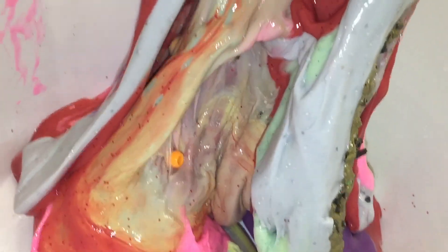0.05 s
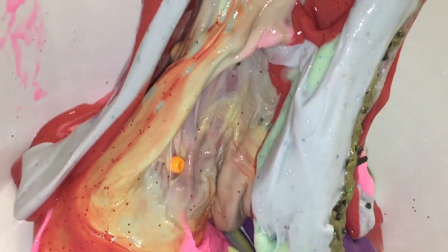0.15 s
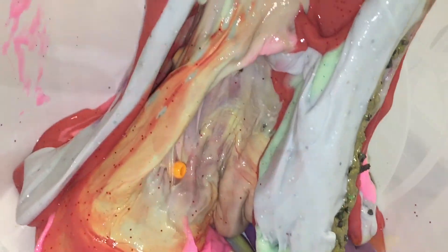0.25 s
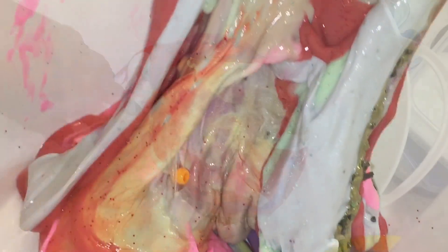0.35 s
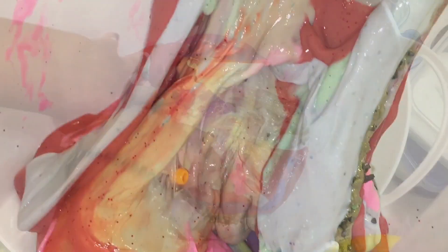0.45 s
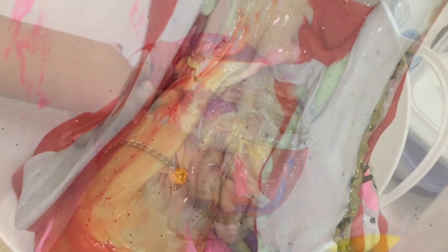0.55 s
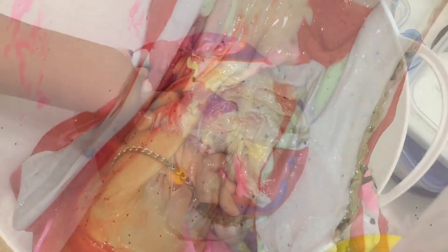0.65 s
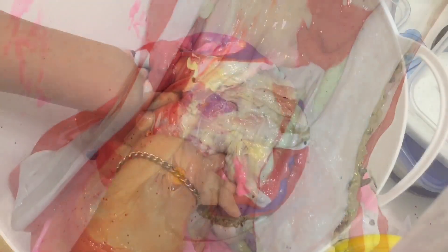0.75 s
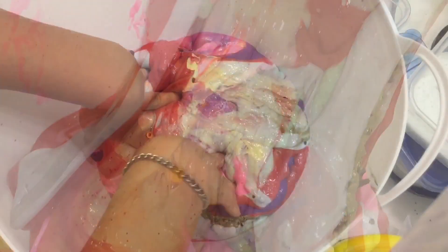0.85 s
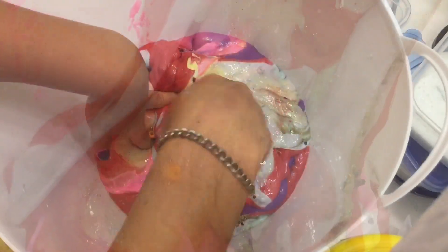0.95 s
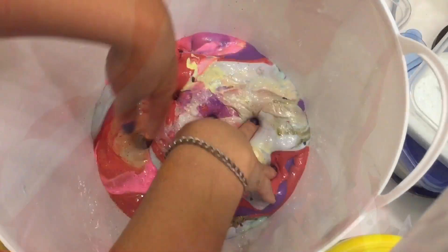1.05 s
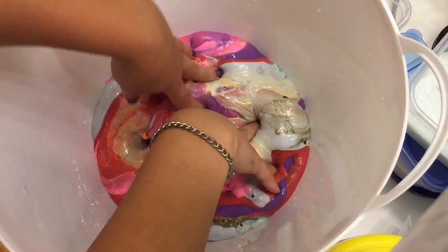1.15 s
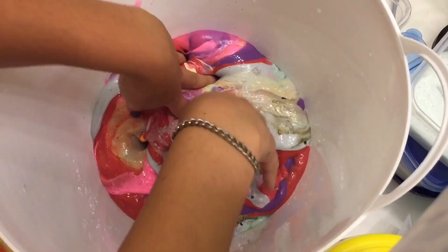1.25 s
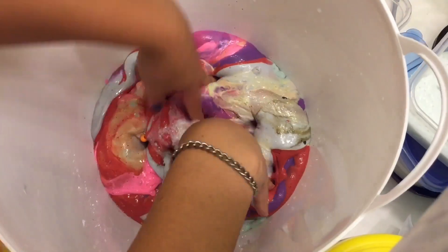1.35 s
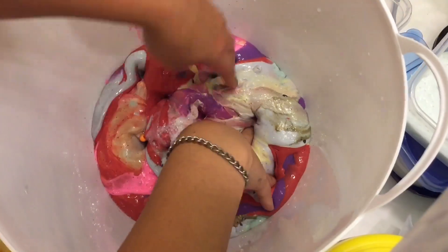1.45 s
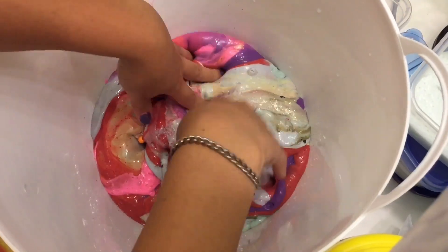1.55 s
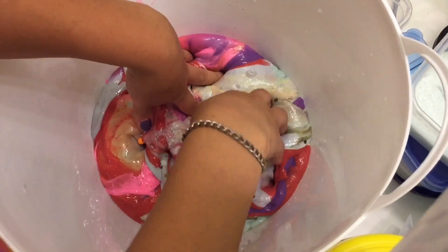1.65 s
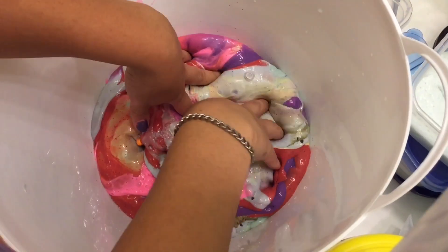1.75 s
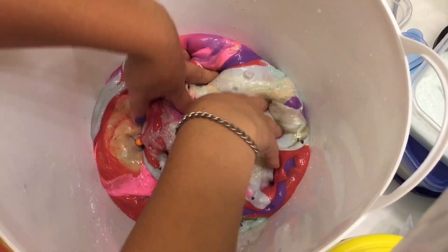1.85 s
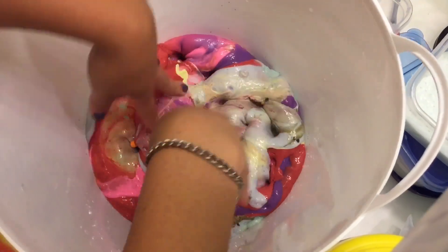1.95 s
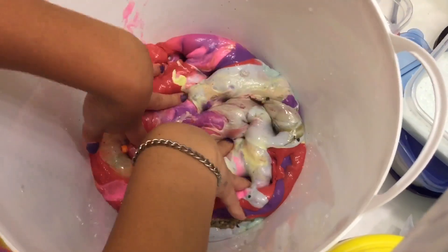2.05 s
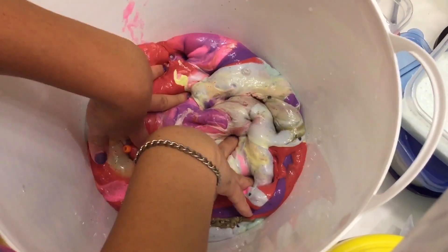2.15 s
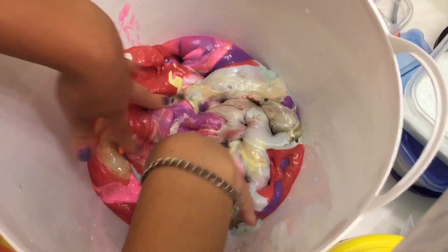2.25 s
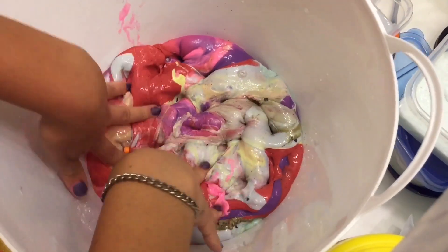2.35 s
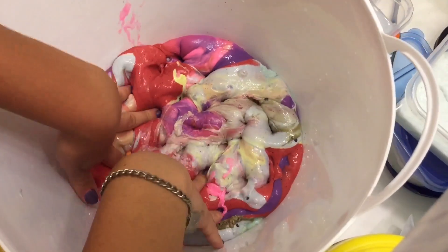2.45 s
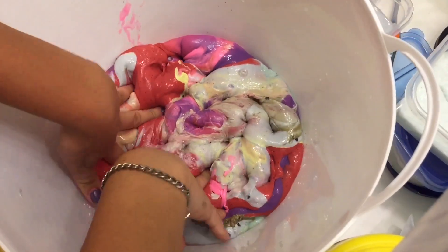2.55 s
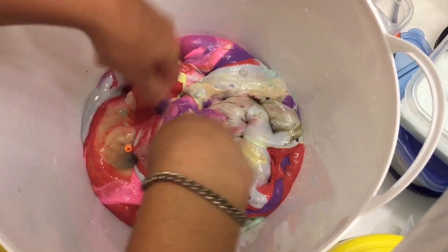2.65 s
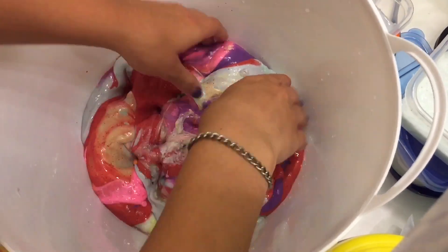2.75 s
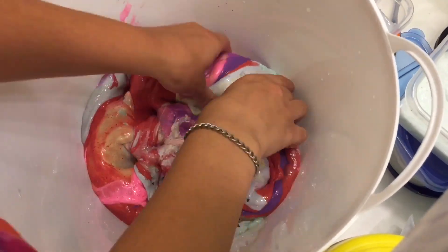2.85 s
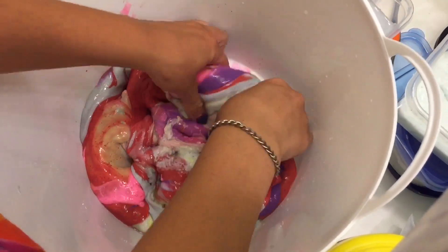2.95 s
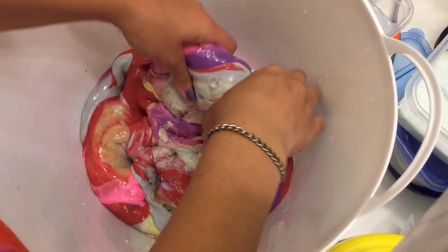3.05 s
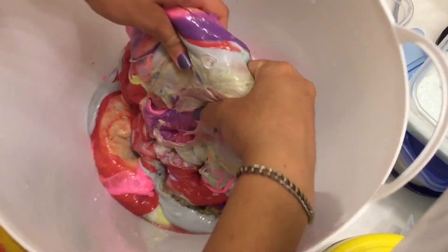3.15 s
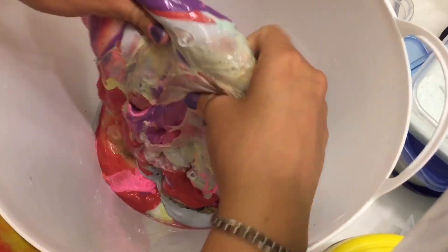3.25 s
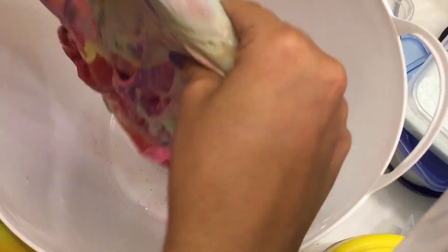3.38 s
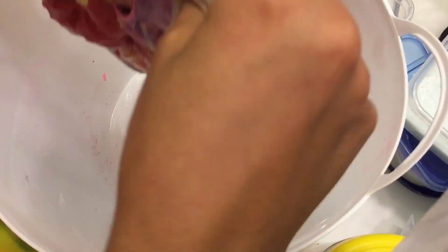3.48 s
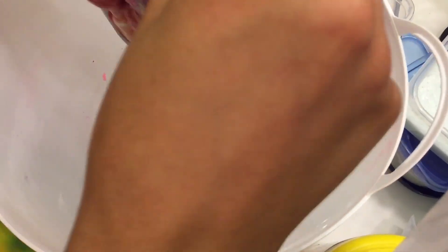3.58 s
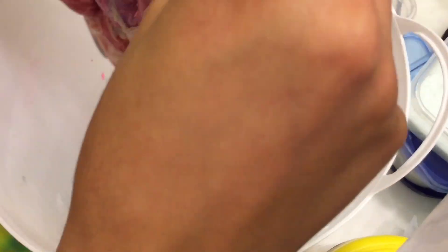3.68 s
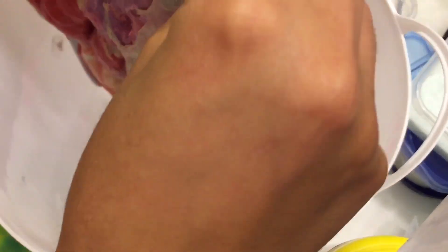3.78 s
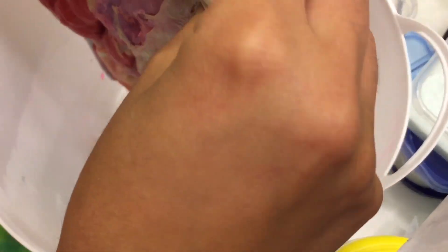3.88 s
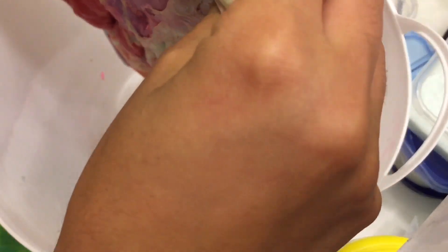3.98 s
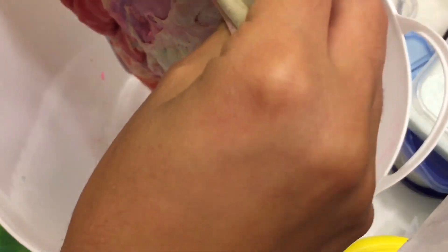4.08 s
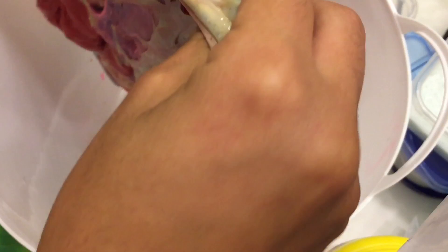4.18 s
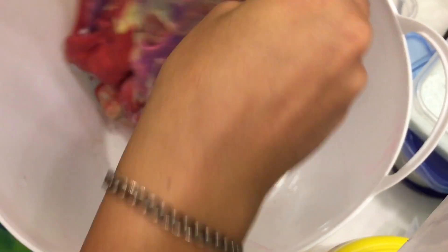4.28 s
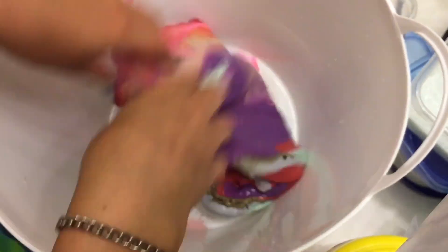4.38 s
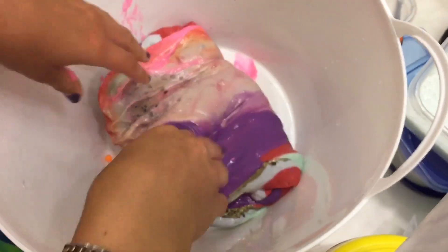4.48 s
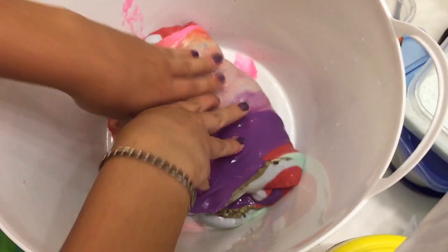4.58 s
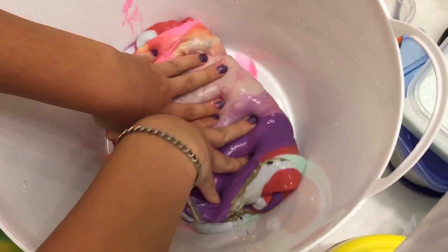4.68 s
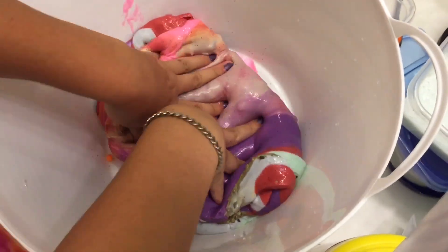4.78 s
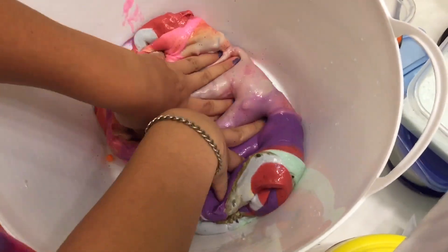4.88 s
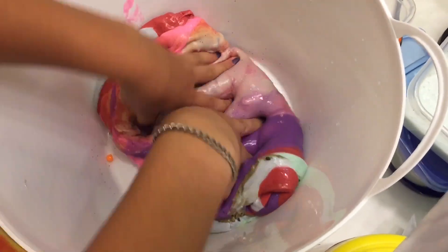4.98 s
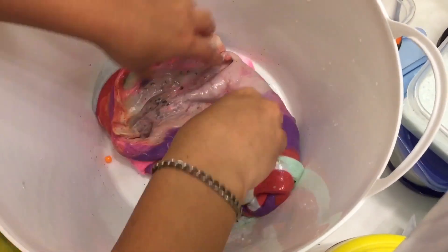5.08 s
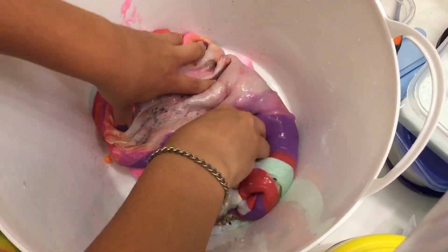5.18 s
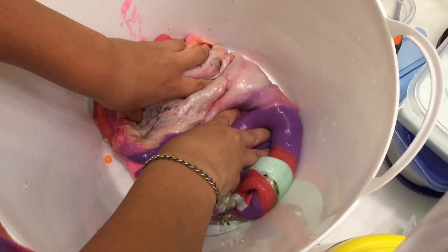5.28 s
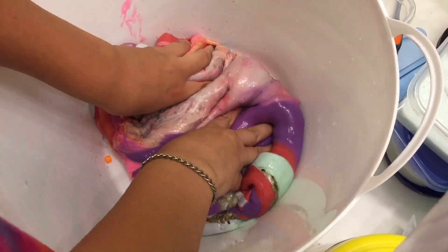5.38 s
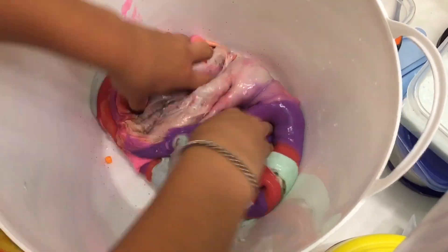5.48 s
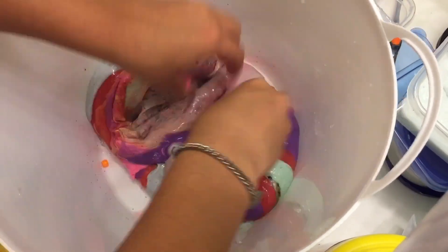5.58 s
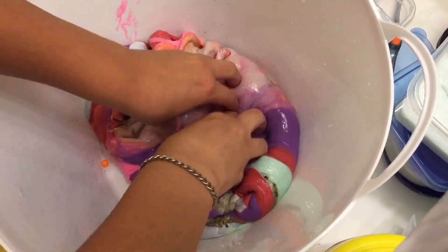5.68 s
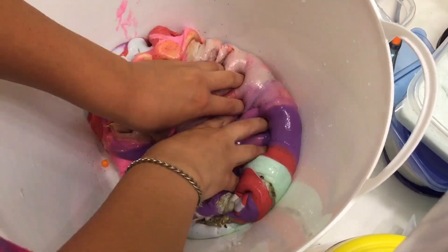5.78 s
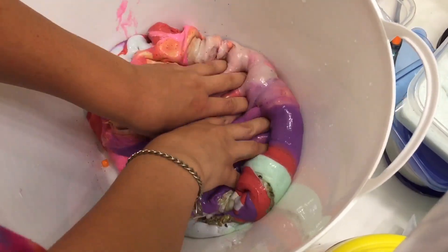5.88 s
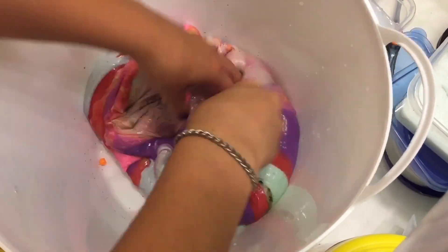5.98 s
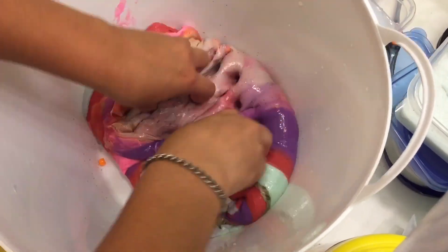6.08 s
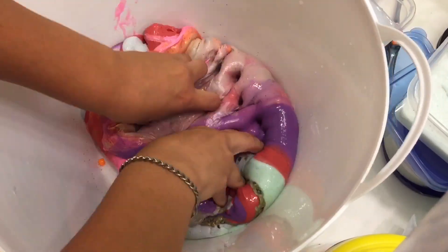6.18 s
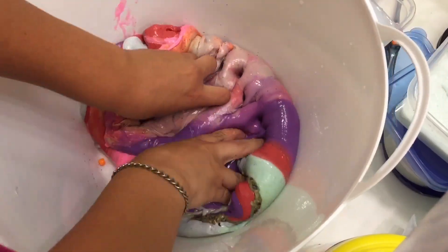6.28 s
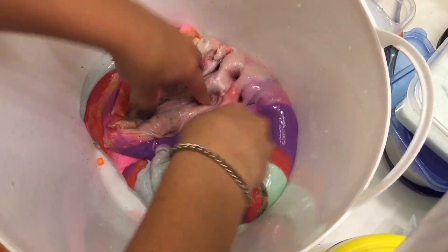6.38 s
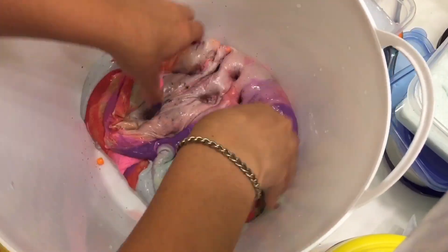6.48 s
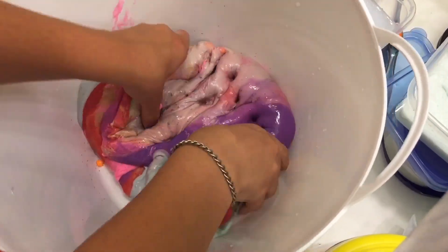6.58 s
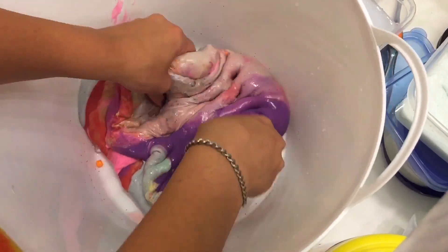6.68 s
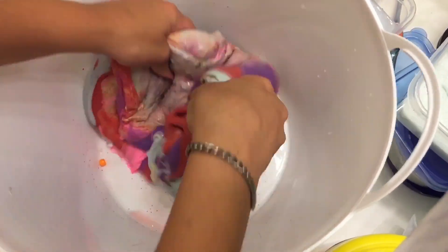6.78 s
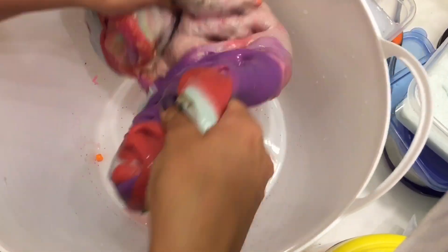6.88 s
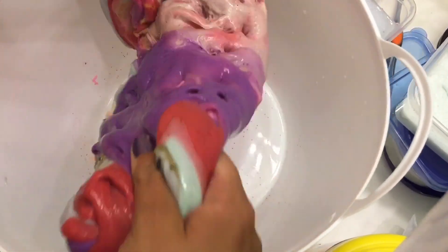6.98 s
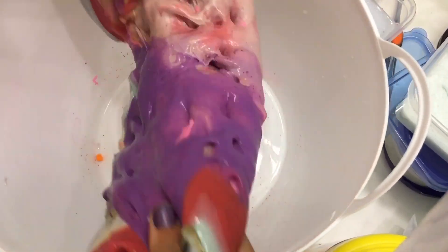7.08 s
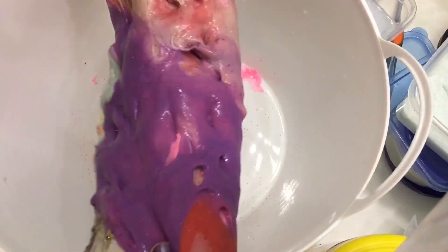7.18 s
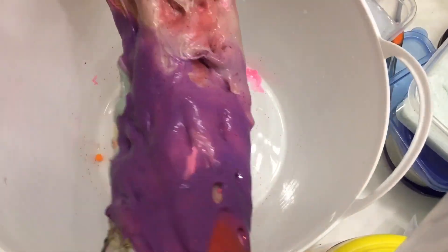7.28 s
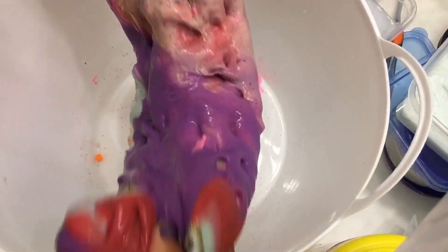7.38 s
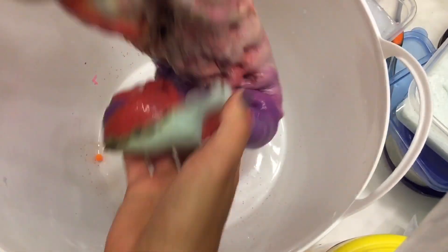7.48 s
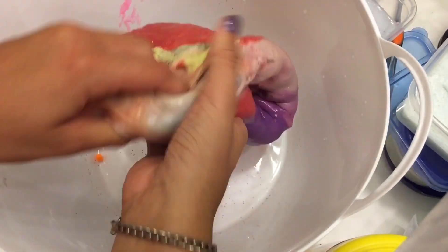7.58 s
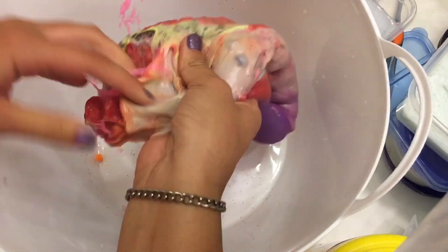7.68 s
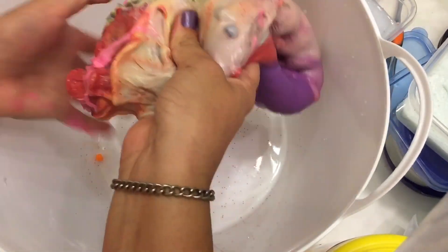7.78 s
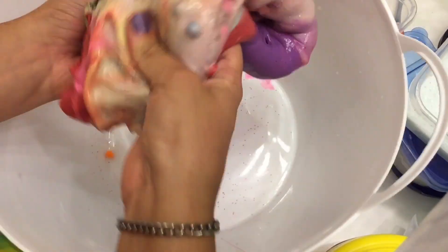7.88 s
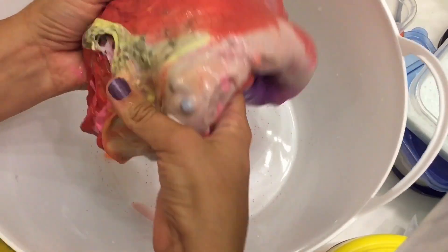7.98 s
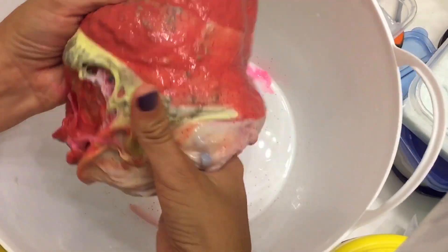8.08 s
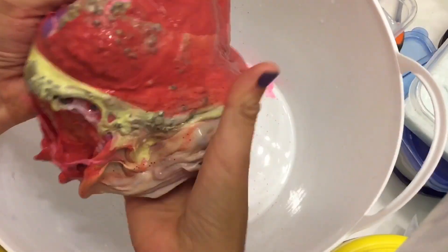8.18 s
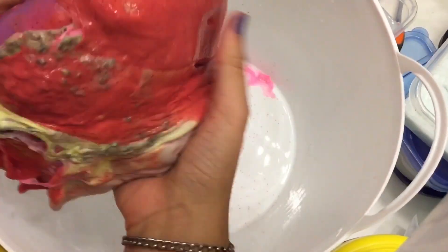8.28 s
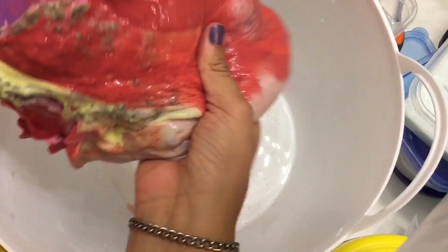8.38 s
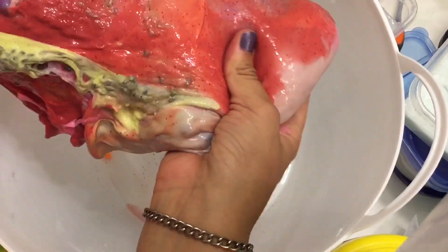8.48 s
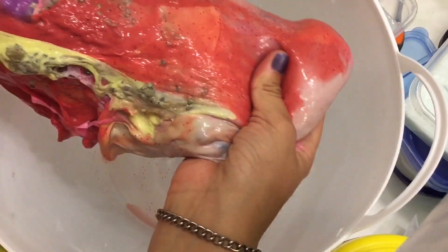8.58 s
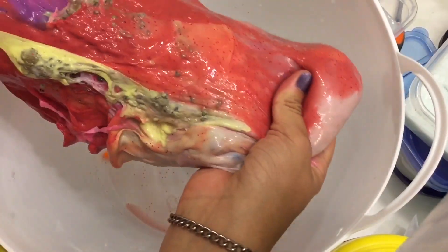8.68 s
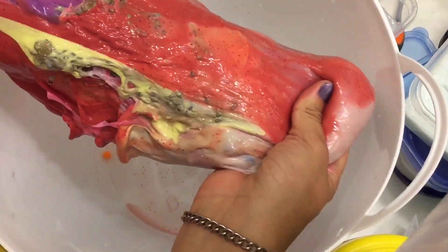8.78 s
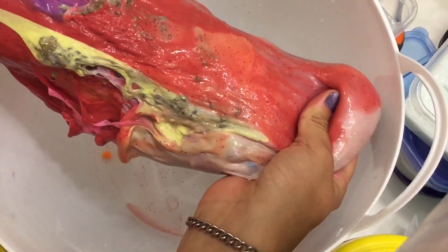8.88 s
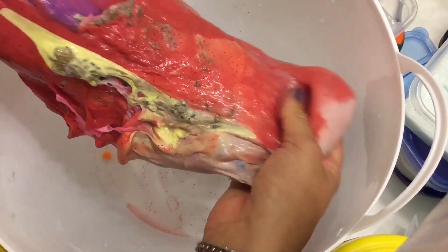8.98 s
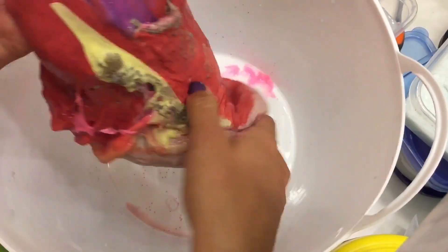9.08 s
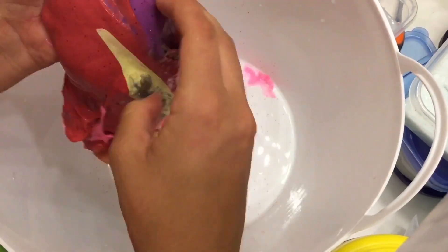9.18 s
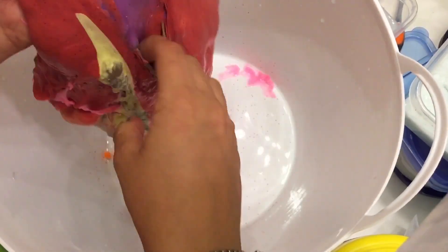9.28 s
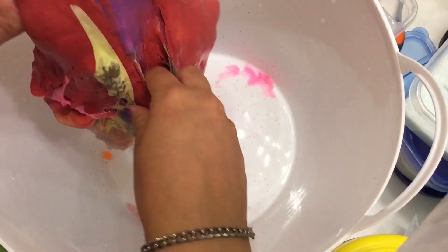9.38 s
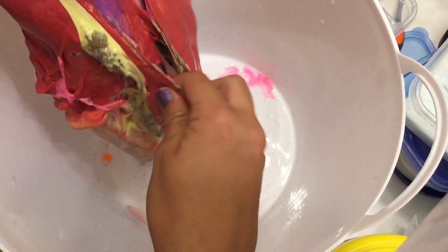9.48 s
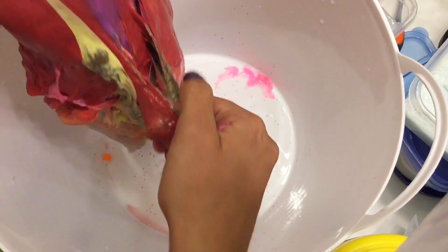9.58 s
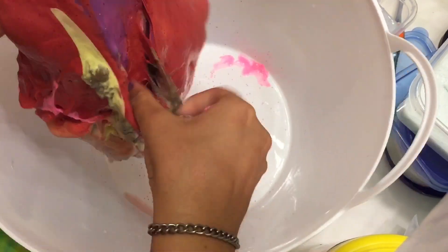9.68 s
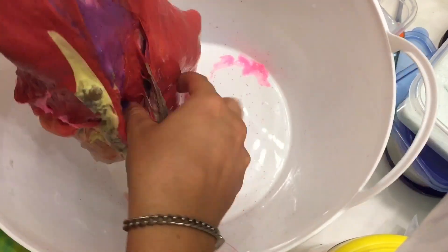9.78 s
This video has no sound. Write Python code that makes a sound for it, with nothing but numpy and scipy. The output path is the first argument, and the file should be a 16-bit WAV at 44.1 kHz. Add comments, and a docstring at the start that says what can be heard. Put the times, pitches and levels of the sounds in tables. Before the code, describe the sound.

Hands squish a large mass of slime, bursting air pockets in sticky snaps, crackles and small hollow thumps.

```python
"""Slime kneaded by hand in a plastic tub, close to one microphone in a small room.
Trapped air pockets burst: a film snaps, a small pocket rings, a large cavity thumps. Air hisses out of
squeezed folds and wet slime fizzes as it peels off skin; the tub and the room ring on after the bursts.
Low room hum and microphone hiss lie underneath; a deeper rumble fades out after the first second."""
import sys
import numpy as np
from scipy import signal
from scipy.fft import rfft, irfft, next_fast_len
from scipy.io import wavfile
from scipy.ndimage import uniform_filter1d, map_coordinates

SR = 44100
rng = np.random.default_rng(int(sys.argv[2]) if len(sys.argv) > 2 else 0)


def digitize_waveform(pressure):
    """Quantize a signal to 16-bit integers and store it at the path in sys.argv[1].

    Rows of a 2-D input are taken as channels; values are limited to [-1, 1].
    """
    field = np.atleast_2d(pressure).T
    bounded = np.clip(field, -1, 1)
    quanta = np.round(bounded * 32767).astype(np.int16)
    wavfile.write(sys.argv[1], SR, quanta)


N = 433944
BURST_T = np.arange(SR // 25) / SR  # time axis of one burst, s

# Tub resonances, plus a dip near 4.4 kHz and a broad treble lift: f/Hz, width/Hz, level/dB
TUB_COLOUR = [(232.8, 3.1, 3.5), (332, 34, 2), (415.8, 9.6, 5.5), (700.4, 69, 7.5), (897, 10, 0),
              (1607, 24, 2.5), (2210, 28, -4.5), (2480, 45, -3), (3490, 100, -1), (4360, 170, -12.5),
              (5260, 3000, -12.5)]
# Course of the room tone: t/s, hum level/dB, rumble level/dB
ROOM_LEVELS = [(0, -55, -48), (.3, -60, -50.5), (.6, -56.5, -55), (.95, -59, -57), (1.05, -53, -103),
               (9.84, -54, -95.5)]


def amp(db):
    """dB to gain."""
    return 10 ** (np.asarray(db) / 20)


def unit(x):
    """Scaled to rms 1."""
    return x / np.sqrt(np.mean(x ** 2) + 1e-20)


def along(points, hz):
    """Interpolate (f/Hz, value) points on a log frequency axis."""
    freqs, values = np.transpose(points)
    return np.interp(np.log(hz + 1), np.log(freqs + 1), values)


def curves(rows):
    """One value per sample for each column after the time."""
    times, *columns = np.transpose(rows)
    return [np.interp(np.arange(N) / SR, times, column) for column in columns]


def filtered(x, response):
    """x through a complex response of frequency."""
    size = next_fast_len(N + SR // 2)
    return irfft(rfft(x, size) * response(np.fft.rfftfreq(size, 1 / SR)), size)[..., :N]


def coloured(x, spectrum):
    """x shaped by a spectrum that is silent outside its points, rms 1."""
    inside = lambda hz: (hz >= spectrum[0][0]) & (hz <= spectrum[-1][0])
    return unit(filtered(x, lambda hz: amp(along(spectrum, hz)) * inside(hz)))


def wobble(per_s):
    """A smooth random curve with per_s knots a second."""
    knots = rng.standard_normal(int(N * per_s / SR) + 4)
    return map_coordinates(knots, [np.arange(N) * per_s / SR])


def modes(table):
    """The response of resonances (f/Hz, width/Hz, level/dB), summed with alternating signs."""
    return lambda hz: sum((-1) ** k * amp(db) * 1j * hz * width / (f * f - hz * hz + 1j * hz * width)
                          for k, (f, width, db) in enumerate(table))


def room_hum():
    """Low room hum with microphone hiss; three faint tones swell in over the first 1.33 s."""
    # Hum and hiss: f/Hz, relative density/dB
    hum_spectrum = [(20, -58), (40, -38.5), (52, -21.5), (64, -9.5), (100, -2), (190, -3.5), (300, -5.5),
                    (430, -11.5), (510, -27), (730, -21.5), (1360, -32), (2400, -31), (4500, -38),
                    (7000, -41), (11000, -40.5), (15300, -44), (16500, -40.5)]
    # Tones in the hum: f/Hz, width/Hz, level/dB
    hum_tones = [(239.2, 1.7, -57), (437.2, 11, -70.5), (128.1, 53, -69.5)]
    hum = amp(curves(ROOM_LEVELS)[0]) * coloured(rng.standard_normal(N), hum_spectrum)
    tones = sum(amp(db) * unit(filtered(rng.standard_normal(N), modes([(hz, width, 0)])))
                for hz, width, db in hum_tones)
    return hum + np.clip(np.arange(N) / SR / 1.33, 0, 1) * tones


def rumble():
    """A deep, wavering noise that drops away after the first second."""
    # Rumble: f/Hz, relative density/dB
    rumble_spectrum = [(12, -26), (22, -10.5), (50, -13), (130, -1.5), (200, -24), (300, -41.5)]
    noise = coloured(rng.standard_normal(N), rumble_spectrum)
    return noise * amp(curves(ROOM_LEVELS)[1] + 1.2 * wobble(per_s=3.7))


def crackle(per_s, spread_db, share):
    """Tiny film ruptures of very uneven size over a bed of noise."""
    ticks = (rng.random(N) < per_s / SR) * amp(spread_db * rng.standard_normal(N))
    decay = np.exp(-np.arange(400) / SR / .0015)
    envelope = unit(signal.fftconvolve(ticks, decay)[:N])
    return (share * envelope + 1 - share) * rng.standard_normal(N)


def peel():
    """Slime tearing off skin fizzes in the treble, in clumps."""
    # Course of the peeling: t/s, level/dB
    peel_levels = [(0.0, -74), (1.01, -86), (2.8, -71.5), (3.01, -52), (3.51, -79.5), (3.94, -102),
                   (4.11, -48.5), (4.25, -70.5), (4.88, -64), (5.34, -77), (6.38, -72), (6.63, -56),
                   (6.85, -61), (7.01, -75.5), (7.95, -72.5), (8.11, -56), (8.25, -71.5), (9.0, -78),
                   (9.4, -66.5), (9.84, -78)]
    # Fizz: f/Hz, relative density/dB
    fizz_spectrum = [(3000, -24), (4500, 6), (6000, 2.5), (9000, -14), (13000, 0), (16000, -6)]
    fizz = coloured(crackle(per_s=150, spread_db=5, share=.6), fizz_spectrum)
    return fizz * amp(curves(peel_levels)[0] + 5.5 * wobble(per_s=11))


def bubble(hz, cycles, rise):
    """A damped air spring; rise lifts its pitch as its mouth opens."""
    turns = hz * BURST_T
    return np.sin(2 * np.pi * turns * (1 + rise * np.minimum(turns, 8))) * np.exp(-turns / cycles)


def room_tail():
    """A fresh echo off the nearby walls, energy 1; each frequency dies at its own speed."""
    # Reverberation of the small room: f/Hz, t60/s
    decay_times = [(200, 0.21), (450, 0.11), (700, 0.17), (1100, 0.098), (2800, 0.18), (7300, 0.089),
                   (15000, 0.11)]
    hz, t, noise = signal.stft(rng.standard_normal(SR // 5), SR, nperseg=128)
    decay = amp(-60 * t / along(decay_times, hz)[:, None])
    tail = signal.istft(noise * decay, SR, nperseg=128)[1]
    tail *= 1 - np.exp(-np.arange(len(tail)) / SR / 0.00022)  # echoes build up after the direct sound
    return tail / np.linalg.norm(tail)


def add_burst(track, start, direct, scattered):
    """One part reaches the microphone directly, the other by way of the walls."""
    for sound in (direct, signal.fftconvolve(scattered, room_tail())):
        span = track[round(start * SR):][:len(sound)]
        span += sound[:len(span)]


def snaps():
    """A surface film snaps and the pocket under it rings; a short, noisy echo follows each pop."""
    # Surface bursts: t/s, snap level/dB, snap f/Hz, pocket f/Hz, pocket level/dB, echo level/dB
    # (all levels relative)
    bursts = [(0.4517, -36, 5620, 3280, -66, -12), (0.6325, -39.5, 4500, 3920, -48.5, 3),
              (0.6841, -47, 10360, 2720, -64, -14), (0.699, -47, 10400, 2540, -50.5, 0.5),
              (0.9738, -40, 5160, 2340, -51, -6), (0.982, -40, 13260, 3920, -49, -6),
              (0.9911, -26, 12900, 2160, -41, -3.5), (1.1057, -36, 5260, 1240, -57, 0),
              (1.113, -33.5, 8370, 2010, -55, -7), (1.1875, -46, 11360, 3130, -55, -12),
              (1.257, -44.5, 12900, 2230, -65, -2), (1.3253, -40.5, 7570, 1440, -61, 7.5),
              (1.3417, -18.5, 12400, 1730, -30.5, -3), (1.3556, -22, 5800, 1850, -29, -10),
              (1.4485, -44, 5900, 2070, -65, 7), (1.473, -43, 6040, 3250, -53.5, 2.5),
              (1.4802, -35.5, 10430, 3200, -51, -2), (1.6135, -33, 7630, 3680, -38.5, -9.5),
              (1.6311, -16, 12200, 3200, -40, -9), (1.6443, -11.5, 11200, 2800, -31, -7.5),
              (1.6869, -35, 12120, 2840, -63, -11), (1.9678, -33, 13300, 2900, -44, 3),
              (1.9811, -25, 14600, 1580, -43, 5.5), (2.0872, -41, 9250, 1860, -55, -4),
              (2.1303, -39, 8060, 2280, -59, -1), (2.217, -39, 13730, 1490, -73, -12),
              (2.3124, -39, 13570, 1520, -57, -2), (2.3233, -45, 11970, 1310, -47.5, -2.5),
              (2.3295, -30, 13700, 1510, -51, 6), (2.3443, -30.5, 5230, 1310, -45, 0.5),
              (2.639, -64, 4780, 3440, -58, 3), (2.684, -28, 12000, 1580, -48.5, 4.5),
              (2.7019, -24.5, 11600, 2420, -42, -7), (2.7983, -36, 4920, 2860, -37.5, 4),
              (2.8088, -32, 6030, 3200, -45, -6), (2.8278, -36, 5300, 2800, -34.5, 1.5),
              (2.8438, -33, 4500, 4300, -34.5, 1), (2.872, -33, 5860, 3000, -42, -2),
              (2.9039, -36, 5920, 3760, -38, -6), (2.919, -27, 5800, 3150, -40, -5.5),
              (2.982, -36.5, 11340, 1450, -48, 0), (3.015, -23.5, 11800, 2400, -29.5, -10),
              (3.0248, -22, 6000, 2230, -37, -14), (3.0805, -23.5, 5760, 2900, -38, -1),
              (3.141, -35, 6340, 2970, -47, 3.5), (3.156, -37, 10360, 3170, -57, -3),
              (3.1758, -30, 4690, 2850, -38.5, -0.5), (3.265, -22.5, 4870, 1940, -38.5, -2),
              (3.284, -53, 5700, 1990, -45, -10), (3.3155, -41, 5810, 1870, -54, -6),
              (3.4254, -50, 6410, 2490, -53.5, 4.5), (3.4571, -28.5, 4830, 2440, -27.5, -7),
              (3.9233, -8, 5270, 3740, -16.5, -3.5), (3.9445, 9.5, 5080, 2460, -12.5, -11),
              (4.0024, -7.5, 5460, 2300, -21, -8.5), (4.098, -45, 5470, 2360, -37, -5.5),
              (4.118, -47, 4800, 2250, -41, -9), (4.1498, -24, 5200, 2420, -34, -9),
              (4.1805, -36, 5910, 2580, -42.5, -2.5), (4.2132, -20, 4700, 2880, -33.5, -7),
              (4.226, -20, 5140, 2290, -40.5, -14), (4.2454, -21, 5930, 2420, -35.5, -11.5),
              (4.4581, -6.5, 5500, 2420, -17, -9), (4.4748, -7, 6300, 2140, -16.5, -4),
              (4.4776, -16, 11400, 1700, -31.5, -1), (4.4934, -21, 4800, 1750, -16.5, -4),
              (4.503, -21, 5600, 4700, -15.5, -6), (4.539, -40, 5030, 2900, -31, -4.5),
              (4.566, -29, 4650, 2190, -29.5, 1), (4.5992, -30, 4810, 2290, -29, 1),
              (4.6499, -54, 5230, 2620, -27, -5.5), (4.674, -47, 4800, 3170, -34.5, -9),
              (4.7286, -33, 5670, 1910, -40, -6), (4.7641, -33.5, 8010, 1830, -59, -6),
              (4.8186, -33, 5850, 3480, -53, -9), (4.8365, -41, 5640, 3500, -59, -8),
              (4.8569, -36, 7730, 2380, -50.5, -0.5), (4.8922, -34, 5050, 2260, -43, -8.5),
              (4.9241, -37, 6140, 2380, -64, -12), (5.05, -43, 11480, 1260, -65, 9),
              (5.0794, -35, 10300, 2540, -50, 0), (5.1005, -15.5, 7960, 1780, -31, -9.5),
              (5.2555, -57.5, 4580, 1300, -41, -6), (5.2798, -47.5, 9600, 1300, -52, -6),
              (5.2957, -42, 5280, 1980, -37, -10), (5.315, -40, 5260, 3000, -44, -12),
              (5.344, -46, 13000, 4400, -52, -5), (5.4004, -45, 13710, 2020, -39, -7.5),
              (5.4114, -31.5, 11900, 2550, -54, -6), (5.4678, -38, 5700, 2840, -49, -7),
              (5.485, -44, 5400, 2500, -55, -16), (5.5044, -34, 12800, 3900, -44, -9),
              (5.5671, -17, 8700, 1620, -28, -7.5), (5.5865, -17, 13420, 1300, -42, -3),
              (5.5924, -21, 5000, 1890, -28.5, -3.5), (5.6168, -20.5, 5100, 2730, -38, -3.5),
              (5.737, -48, 4500, 1290, -34.5, -2.5), (5.7568, -34, 6580, 2430, -37, -8),
              (5.7688, -39.5, 8700, 1700, -54, -2), (5.8413, -39, 9220, 1570, -70, -18),
              (5.8592, -44, 14900, 2260, -69, -4), (5.8936, -44, 13880, 3100, -63, -9),
              (5.9818, -45, 13200, 2940, -52, -7.5), (6.0274, -39.5, 11920, 2980, -54, -1),
              (6.047, -20, 13100, 2700, -29, -4), (6.0593, -20, 9100, 2930, -31, -8),
              (6.0787, -21, 14650, 2660, -42, -1), (6.1013, -38, 12100, 2520, -49, -11),
              (6.2156, -29, 6600, 2670, -35.5, -6), (6.2804, -40.5, 5200, 1820, -50, -3),
              (6.3234, -47, 10200, 2870, -68, -3), (6.3397, -31, 4840, 1920, -39.5, -3),
              (6.4378, -34, 4670, 4490, -46, -2), (6.446, -24, 12420, 2870, -46, -2),
              (6.471, -26, 9800, 3240, -49, 8), (6.478, -17.5, 11440, 2830, -25.5, -5.5),
              (6.4854, -17, 5630, 2850, -26.5, -8), (6.5418, -25, 5220, 2990, -33.5, -3.5),
              (6.5636, -22, 5930, 2930, -28.5, -3.5), (6.5847, -22, 5800, 3250, -47, -2),
              (6.6043, -28.5, 5730, 3240, -40, 2), (6.6518, -34, 5320, 1940, -39.5, -6),
              (6.678, -46, 9500, 3000, -64, -10), (6.7661, -40.5, 6090, 1820, -47.5, 2),
              (6.7963, -44, 5450, 2050, -40.5, -5.5), (6.815, -37, 5700, 3900, -51, -9),
              (6.8276, -48, 9100, 1770, -60.5, 12), (6.9433, -19, 4910, 2560, -20, -4),
              (6.9528, -17, 4670, 2070, -20.5, -3.5), (7.002, -26.5, 5550, 2335, -29.5, -3.5),
              (7.0237, -47.5, 8700, 1690, -39.5, -3), (7.2291, 3.5, 4800, 2370, -13.5, -7.5),
              (7.2536, -9, 5120, 2010, -31.5, -11), (7.3428, -41, 9450, 2200, -34.5, -13),
              (7.4477, -39.5, 13600, 3750, -73, -14), (7.5997, -37, 5080, 4420, -59, -4),
              (7.6148, -27.5, 4750, 4490, -35.5, -16), (7.6645, -41, 4750, 3480, -52, -12),
              (7.689, -35, 7500, 3780, -68, -6), (7.7623, -41, 5190, 3240, -52.5, -1),
              (7.793, -49.5, 8400, 3100, -64.5, -5), (7.8776, -37, 5230, 4610, -38, -6),
              (7.9301, -35, 4970, 2460, -30.5, -4.5), (7.9399, -32, 4910, 2250, -29.5, -3),
              (7.9563, -32, 13310, 1440, -46, -7), (7.9816, -43, 5320, 2060, -34.5, -8),
              (8.0529, -24.5, 8400, 3360, -29.5, -3.5), (8.0888, -42, 7950, 1680, -43, -5.5),
              (8.116, -40, 5860, 2420, -39.5, 2.5), (8.1278, -20, 4500, 2420, -22.5, -7.5),
              (8.1506, -0.5, 5000, 2570, -10.5, -10.5), (8.1705, -11, 5000, 2220, -27, -11.5),
              (8.184, -20, 5000, 2260, -37.5, -9), (8.1922, -16.5, 4900, 3430, -36, -7),
              (8.2082, -23, 6040, 2260, -35, -4), (8.2212, -27, 13600, 2800, -43, -3),
              (8.229, -34, 7900, 2900, -49, -1), (8.2507, -26, 4950, 2690, -30, -4),
              (8.299, -47.5, 9100, 1240, -48.5, -2), (8.4617, -39, 8630, 1310, -77.5, -1),
              (8.534, -46, 12200, 2410, -70, -4), (8.6755, -47.5, 5450, 2340, -55, -10),
              (8.7362, -47, 9330, 1796, -76, -16), (9.1356, -35.5, 5030, 3200, -43, 1),
              (9.1494, -40, 5160, 3020, -36.5, -2), (9.2227, -40.5, 10200, 3820, -56, -18),
              (9.3003, -40, 6070, 2740, -36, -7), (9.3565, -49, 8400, 1230, -58, 2),
              (9.4401, -37, 4970, 3180, -66, -4), (9.4491, -31, 4950, 3830, -58, -6),
              (9.4679, -35, 12750, 4000, -52, -6), (9.507, -48, 12600, 3800, -68, -12),
              (9.5473, -41, 11220, 3900, -41.5, 5.5), (9.5537, -26, 5010, 1300, -32.5, 1.5),
              (9.577, -29, 4510, 1260, -36, -2)]
    track, t = np.zeros(N), BURST_T
    hz = np.fft.rfftfreq(len(t), 1 / SR)
    tiny_film = modes([(8500, 12000, 0)])(hz) ** 2  # radiates treble only
    opening = 1 - np.exp(-t / 0.0001)
    for start, snap_db, snap_hz, pocket_hz, pocket_db, echo_db in bursts:
        film = tiny_film * (0.43 + modes([(snap_hz, .3 * snap_hz, 1.5)])(hz))
        tear = rng.standard_normal(len(t)) * opening * np.exp(-t / 0.00051)
        tear /= np.abs(tear).max()
        snap = amp(snap_db + 7.5) * irfft(film * rfft(tear), len(t))
        pocket = amp(pocket_db + 9.5) * opening * bubble(pocket_hz, cycles=3.03, rise=0.0026)
        echo_pulse = amp(pocket_db + 19.5) * bubble(pocket_hz, cycles=.7, rise=0)  # broadens the echo
        scattered = amp(echo_db) * (amp(1.5) * snap + amp(-21) * pocket + echo_pulse)
        add_burst(track, start, amp(-2) * snap + pocket, scattered)
    return track


def squeezes():
    """Ragged air noise through a fold whose resonance sags as it relaxes; the tub air answers lower."""
    # Squeezed folds: start t/s, rise/s, fall/s, peak level/dB, fold f/Hz
    folds = [(0.601, 0.075, 0.12, -47, 2350), (0.958, 0.024, 0.52, -47, 2630),
             (1.601, .018, 0.062, -49, 2850), (2.782, 0.025, 0.45, -41.5, 2600),
             (3.001, 0.017, 0.054, -43, 2190), (3.13, 0.13, 0.17, -45.5, 2470),
             (3.999, 0.0067, 0.12, -32, 3020), (4.1, 0.17, 0.059, -51, 3000),
             (4.489, 0.0042, .1, -28, 2460), (4.55, 0.2, 0.089, -50, 2210),
             (5.249, 0.0054, 0.44, -50, 2320), (5.556, 0.048, 0.076, -30, 2300),
             (6.021, 0.031, 0.031, -31, 2660), (6.5, 0.093, 0.21, -36, 2685),
             (6.661, 0.22, 0.32, -44, 2220), (7.581, 0.027, 0.17, -50.5, 4250),
             (7.879, 0.059, .04, -37, 2660), (9.14, 0.0092, 0.11, -32.5, 2430),
             (9.422, 0.035, 0.15, -51.5, 4470), (9.559, 0.0064, 0.13, -39.5, 2050),
             (9.641, 0.096, 0.11, -42, 2650)]
    swell_db, sag_oct_per_s, log_width = 38, 0.47, .38
    frames = dict(fs=SR, nperseg=512, noverlap=384)
    hz, t, air = signal.stft(crackle(per_s=700, spread_db=3.5, share=.45), **frames)
    patches = uniform_filter1d(rng.standard_normal(air.shape), 4, axis=0)
    patches = uniform_filter1d(patches, 8, axis=1)  # small wet cavities come and go
    tub_air = amp(-3.5) / (1 + ((hz[:, None] - 780) / 160) ** 4)
    gain = np.zeros(air.shape)
    for start, rise, fall, peak_db, fold_hz in folds:
        since_peak = t - start - rise
        centre_hz = fold_hz * 2 ** (-sag_oct_per_s * np.clip(since_peak, -rise, fall))
        detune = np.log((hz[:, None] + 1) / centre_hz) / log_width
        shape = 1 / (1 + detune ** 4) + tub_air + 0.11
        shape /= np.sqrt(np.mean(shape ** 2, axis=0))
        level_db = peak_db - swell_db * np.maximum(-since_peak / rise, since_peak / fall)
        gain += (t > start) * amp(level_db) * shape
    hiss = signal.istft(air * gain * amp(2.2 * unit(patches)), **frames)[1][:N]
    return filtered(hiss, lambda hz: 1 + modes(TUB_COLOUR)(hz))


def thumps():
    """A large cavity collapses with a short, low ring, and the thump echoes in the room."""
    # Cavities: t/s, level/dB, f/Hz, echo level/dB (both levels relative)
    collapses = [(0.632, -37.5, 485, -5), (0.992, -41, 736, 2.5), (1.106, -30.5, 780, -1.5),
                 (1.146, -34, 300, -7), (1.355, -29, 940, -6), (1.48, -41, 710, -11),
                 (1.632, -24.5, 680, -8.5), (1.645, -27, 970, -1.5), (1.981, -25, 664, -9),
                 (2.097, -24.5, 740, -11.5), (2.325, -33.5, 670, -5), (2.331, -29, 730, -2.5),
                 (2.465, -35.5, 695, -10), (2.684, -43, 240, -7), (2.703, -32.5, 420, 0),
                 (2.798, -31, 374, -6), (2.827, -32, 690, -11), (2.844, -29, 683, -7), (2.904, -38, 730, 6),
                 (2.955, -38, 720, -3), (2.988, -33.5, 706, -3), (3.015, -16, 680, -8.5),
                 (3.174, -32, 710, -0.5), (3.233, -37, 384, -8), (3.265, -33.5, 670, -8),
                 (3.345, -39, 710, -7.5), (3.425, -42.5, 300, -7.5), (3.457, -16, 346, -8),
                 (3.462, -17, 740, -7.5), (4.479, -24.5, 675, -6), (4.494, -18, 920, -8),
                 (4.54, -30, 900, -7), (4.567, -20, 750, -11), (4.599, -22, 845, -11),
                 (4.628, -25, 820, -4.5), (4.65, -30, 730, -9), (4.729, -23.5, 800, -7.5),
                 (4.892, -27, 760, -4), (5.099, -29.5, 1180, -5), (5.258, -26, 704, -3.5),
                 (5.315, -34, 870, -7), (5.468, -37, 734, -4), (5.586, -44, 1210, -2),
                 (5.592, -28, 1200, -14), (5.617, -22.5, 720, -5.5), (5.737, -20, 737, -6),
                 (5.757, -36, 790, -8.5), (6.052, -26.5, 750, -2), (6.078, -36, 302, -1),
                 (6.208, -23.5, 710, -3.5), (6.281, -29, 734, -13), (6.338, -37, 403, -11),
                 (6.439, -39, 825, 5), (6.466, -38, 235, -3.5), (6.47, -32, 700, -13),
                 (6.543, -25, 654, -8), (6.584, -27.5, 890, -9), (6.62, -28, 740, -3),
                 (6.652, -28.5, 690, -5), (6.671, -30, 750, -7.5), (6.797, -37.5, 1210, -5.5),
                 (6.944, -11, 370, -8), (6.952, -2, 636, -8.5), (7.229, -34, 700, -8),
                 (7.901, -33.5, 433, -1.5), (7.932, -16, 656, -5.5), (7.94, -10, 600, -8),
                 (7.98, -17.5, 630, -5), (8.053, -17.5, 704, -6), (8.117, -27.5, 680, -7.5),
                 (8.128, -11.5, 630, -5.5), (8.231, -26.5, 390, -4.5), (8.25, -18.5, 694, -4.5),
                 (8.257, -18.5, 396, -12), (9.148, -27.5, 593, 0.5), (9.299, -31.5, 1030, -1.5),
                 (9.542, -38, 306, -12), (9.554, -21, 1000, -5), (9.561, -22.5, 726, -13),
                 (9.576, -24, 1030, -3)]
    track = np.zeros(N)
    for start, cavity_db, cavity_hz, echo_db in collapses:
        cavity = amp(cavity_db + 1) * bubble(cavity_hz, cycles=1.8, rise=0.00087)
        echo_pulse = amp(cavity_db + echo_db + 8) * bubble(cavity_hz, cycles=.8, rise=0)
        add_burst(track, start, cavity, amp(-17) * cavity + echo_pulse)
    return track


def in_tub(bursts):
    """Bursts too small to radiate deep bass set the tub ringing; its floor echo cuts a notch."""
    # Where the floor echo cancels: f/Hz, width/Hz, echo level/dB
    floor_notch = [(505, 140, -2.5)]
    bursts = signal.lfilter(*signal.butter(3, 170, "high", fs=SR), bursts)
    return filtered(bursts, lambda hz: (1 + modes(TUB_COLOUR)(hz)) * (1 - modes(floor_notch)(hz)))


def scene():
    """Slime close up, room tone behind, in mono."""
    return (in_tub(snaps() + thumps()) + peel() + squeezes() + room_hum() + rumble())[None]


def record(dry):
    """A soft limiter keeps the loudest cracks below full scale; the highest treble is cut off."""
    ceiling, top_hz = .77, 15900
    soft = dry / (1 + np.abs(dry / ceiling) ** 6) ** (1 / 6)
    return filtered(soft, lambda hz: 1 / (1 + (hz / top_hz) ** 120))


dry = scene()
out = record(dry)
digitize_waveform(out)
```